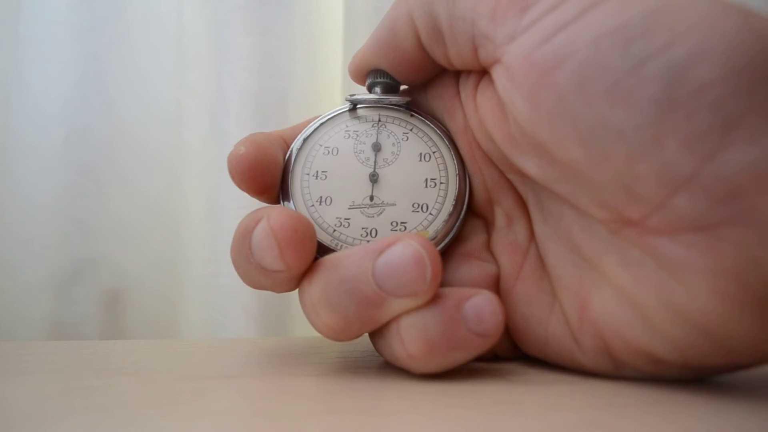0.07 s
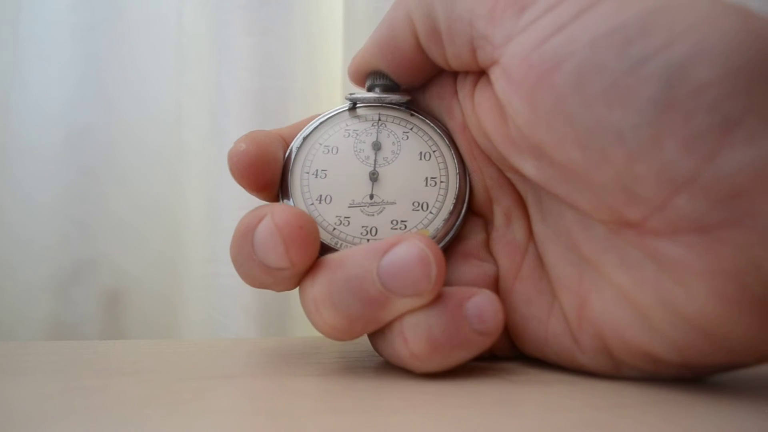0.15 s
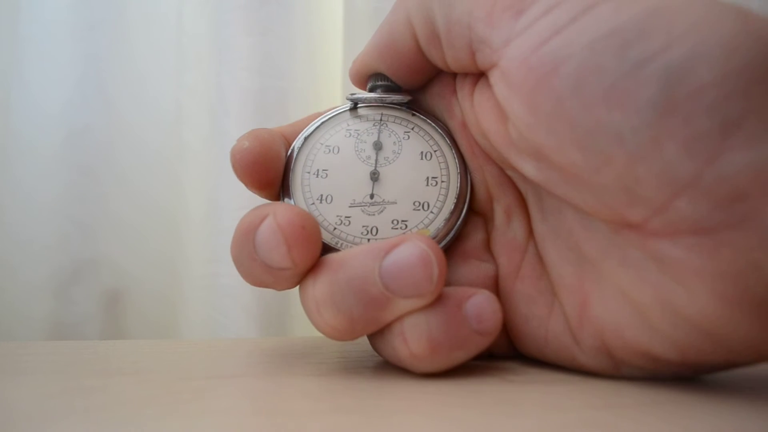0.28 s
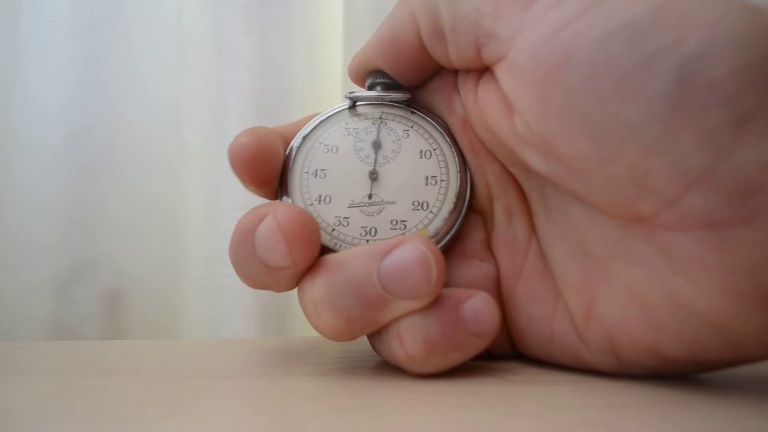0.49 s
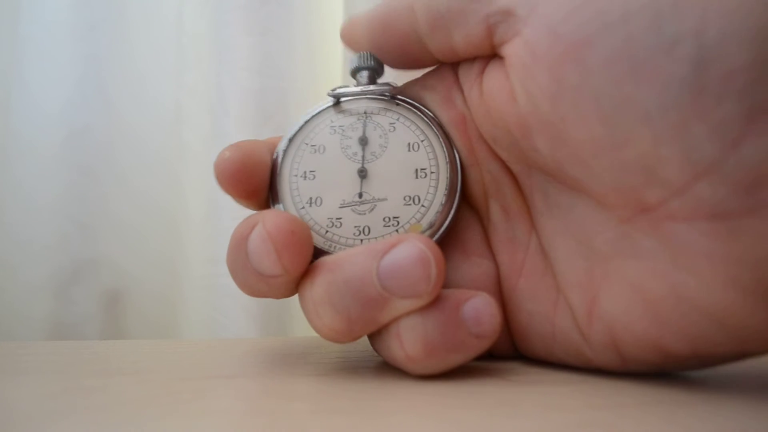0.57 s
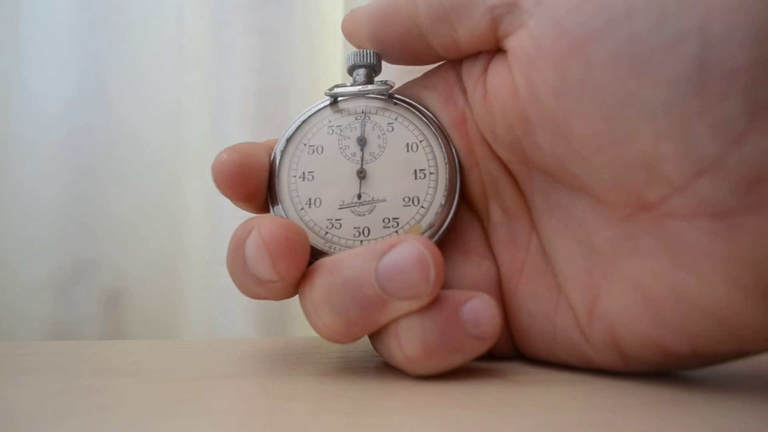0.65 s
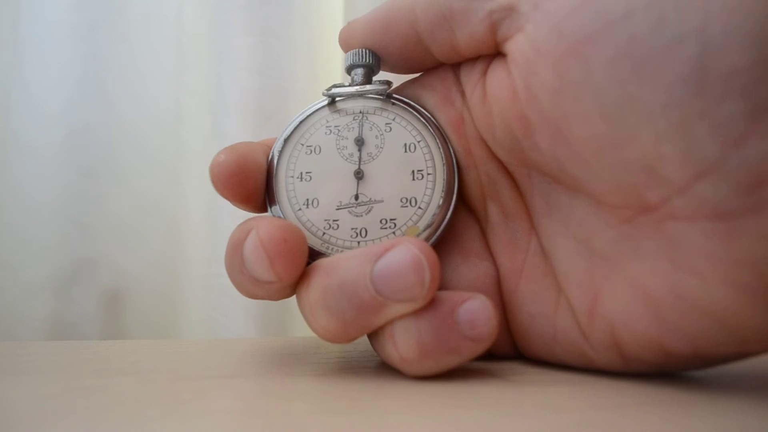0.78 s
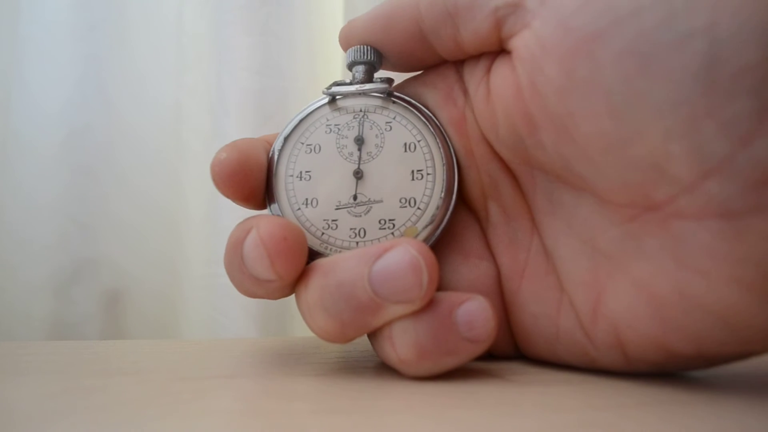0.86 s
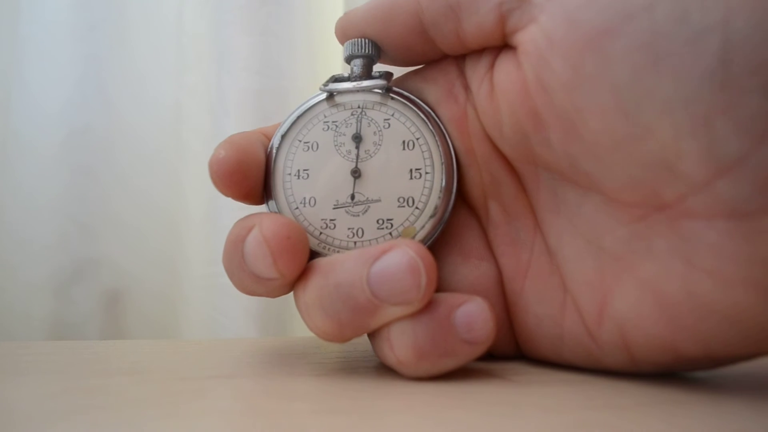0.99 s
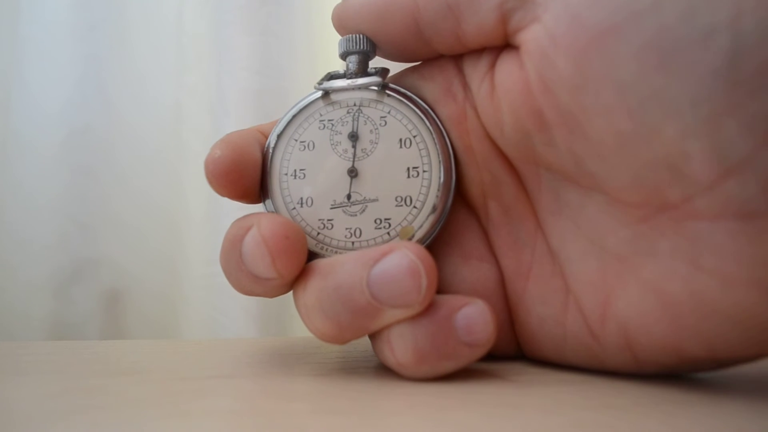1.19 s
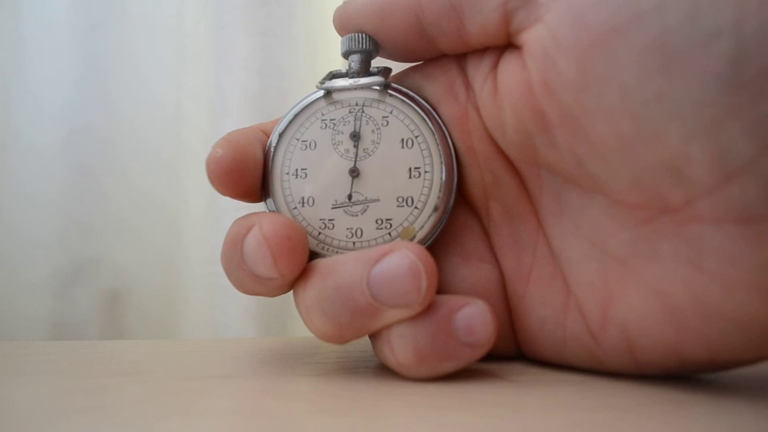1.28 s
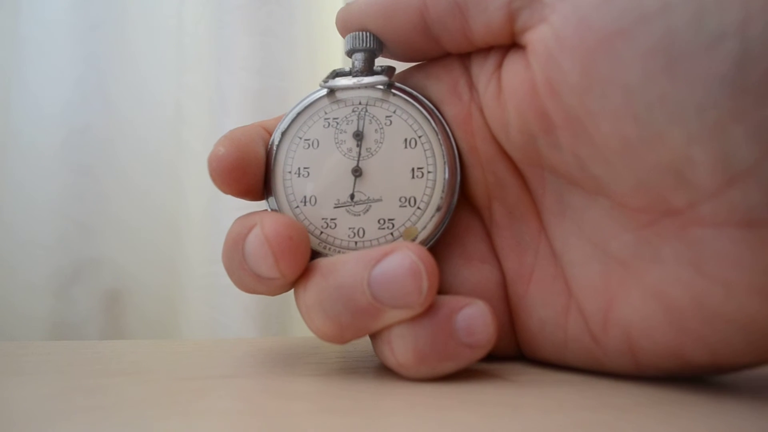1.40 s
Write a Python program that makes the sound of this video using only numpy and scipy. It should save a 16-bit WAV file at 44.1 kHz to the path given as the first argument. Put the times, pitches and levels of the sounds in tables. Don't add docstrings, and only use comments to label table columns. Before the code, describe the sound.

Close-up stopwatch button press and release indoors, a sharp bright click followed about 0.4 seconds later by a quieter, looser return click, with tiny regular escapement ticks, short room reflections and low air hiss underneath.

```python
import sys
import numpy as np
from scipy import signal
from scipy.io import wavfile
from scipy.ndimage import uniform_filter1d

SR = 44100
rng = np.random.default_rng(int(sys.argv[2]) if len(sys.argv) > 2 else 0)


def dump(signal):
    limited = np.clip(np.atleast_2d(signal).T, -1, 1)
    pcm = np.round(limited * 32767).astype(np.int16)
    wavfile.write(sys.argv[1], SR, pcm)


def volts_from_db(level):
    exponent = np.asarray(level, float) / 20
    return 10 ** exponent


N = 63945

# (time [s], level [dB], brightness [dB per octave])
SETTLE_HITS = [
    (0.0402, -43.5, 0),
    (.0411, -34.5, -0.6),
]
# (time [s], level [dB], brightness [dB per octave])
PRESS_HITS = [
    (.2214, -65.5, -6),
    (.2232, -12, -1.16),
    (.2237, -18, 4),
    (.2256, -42, 5.5),
]
# (time [s], level [dB], brightness [dB per octave], bridge ring [dB])
TICK_HITS = [
    (0.438, -68, 1.5, 1),
    (.4815, -58.5, -1.3, 8),
    (0.6859, -59.5, 4.5, -7),
    (0.8546, -69, 1.5, -7),
    (.8860, -53, -2.5, -8),
    (1.068, -83.5, 12.5, -2),
    (1.0925, -61, 2, 7),
    (1.2400, -66, -6, 1),
    (1.266, -72, 4.5, 0),
    (1.2926, -56, 2.5, -2),
]
# (time [s], level [dB], brightness [dB per octave])
RELEASE_HITS = [
    (.6054, -43, -5.5),
    (.6151, -38.5, -22.5),
    (.6161, -27, 11),
    (.6177, -17, -1.5),
    (0.6192, -32, -1),
    (0.6254, -36.5, -6.5),
    (0.6283, -46.5, 10),
    (.7160, -46.5, -6.5),
]


def evened(x):
    return x / np.sqrt(np.mean(x ** 2) + 1e-20)


def read(points, hz):
    f, value = np.transpose(points)
    return np.interp(np.log(hz + 1), np.log(f + 1), value)


def air():
    # (frequency [Hz], level [dB per Hz])
    hiss_tone = [(12, -37), (20, -11), (65, -18.5), (102, -16), (170, -8.5), (996, -3.5), (2410, -14.5),
                 (4460, -22), (12000, -43.5), (15600, -85.5), (22000, -120)]
    # (frequency [Hz], width [Hz], rise [dB])
    fan = [(220.2, 14, 8.5), (297.8, 22, 10), (416, 41.5, 6.5), (1026, 71, 3), (2838, 190, 9),
           (4518, 180, 9.5), (5250, 650, 6), (9400, 400, 2)]
    frames, hz = N // 512 + 5, np.fft.rfftfreq(2048, 1 / SR)
    real, imaginary, patches = rng.standard_normal((frames, 1025, 3)).T
    patches = evened(uniform_filter1d(uniform_filter1d(patches, 20, 0), 6, 1))
    shape_db = read(hiss_tone, hz) - 12 * np.clip((hz - 10500) / 1000, 0, 4)
    for centre_hz, width_hz, rise_db in fan:
        shape_db = shape_db + rise_db * np.exp(-2 * ((hz - centre_hz) / width_hz) ** 2)
    spectrum = (real + 1j * imaginary) * volts_from_db(shape_db[:, None] + 1.15 * patches)
    hiss = evened(signal.istft(spectrum, nperseg=2048, noverlap=1536)[1][:N])

    waver = evened(uniform_filter1d(uniform_filter1d(rng.standard_normal(N), 2000), 2000))
    hum_hz, hum_db, waver_db = 119.2, -70, 0.5
    hum = np.sqrt(2) * np.sin(2 * np.pi * hum_hz * np.arange(N) / SR)
    return volts_from_db(-60) * hiss + volts_from_db(hum_db + waver_db * waver) * hum


def strike(hits, modes, rise_s):
    hz, mode_db, t60 = np.transpose(modes)[:, :, None]
    bridge_hz, bridge_width_hz, spread_db = 4660, 830, 1.2
    bridge = np.exp(-((hz - bridge_hz) / bridge_width_hz) ** 2)
    signs = (-1.) ** np.arange(len(modes))[:, None]
    out, clock = np.zeros(N), np.arange(N) / SR
    spreads = rng.standard_normal((len(hits), len(modes), 1))
    for (start_s, db, tilt_db, *bridge_db), spread in zip(hits, spreads):
        first = int(start_s * SR) + 1
        t = clock[first:first + 8000] - start_s
        start_db = db + mode_db + tilt_db * np.log2(hz / 4000) + spread_db * spread
        start_db = start_db + sum(bridge_db) * bridge
        level = volts_from_db(start_db - 60 * t / t60)
        ringing = (signs * level * np.sin(2 * np.pi * hz * t)).sum(0)
        out[first:first + 8000] += (1 - np.exp(-t / rise_s)) * ringing
    return out


def settle():
    # (frequency [Hz], level [dB], t60 [s])
    touched_case = [(1064, -6.5, 0.0046), (1664, -12, 0.016), (2300, -7, 0.023), (2720, -1, 0.021),
                    (2930, -15, 0.0073), (4857, -5.5, 0.019), (5255, -14.5, 0.016), (7400, -17, 0.013),
                    (8690, -17, 0.008), (9480, -13, 0.0095), (11110, -33, .01)]
    return strike(SETTLE_HITS, touched_case, 0.0002)


def snap():
    start_s, db, _ = PRESS_HITS[1]
    t = np.maximum(np.arange(N) / SR - start_s, 0)
    crack, thud = t * 9700, t * 300 * 2 * np.pi
    body = volts_from_db(-6.5) * crack * (2 - crack) * np.exp(-crack)
    body += volts_from_db(-30) * thud * np.exp(-thud)
    return volts_from_db(db) * np.e * body


def press():
    # (frequency [Hz], level [dB], t60 [s])
    gripped_case = [(1245, -5.5, 0.0095), (1780, -2.5, 0.0068), (2632, -6, 0.023), (2460, -16, 0.047),
                    (2950, -3, 0.011), (3800, -18, 0.0067), (4906, 6, 0.026), (4710, -15.5, 0.048),
                    (5877, -11.5, 0.0086), (6800, 1, 0.0089), (7550, -8.5, .01), (9160, 1.5, 0.0085),
                    (10220, -7, 0.0044), (11000, -16, .003)]
    return strike(PRESS_HITS, gripped_case, 0.0001) + snap()


def ticks():
    # (frequency [Hz], level [dB], t60 [s])
    plates = [(2240, 2, 0.031), (2716, 2.5, 0.016), (2950, 3, 0.024), (3950, -3.5, 0.013),
              (4520, -5, 0.013), (5080, -3.5, .014), (6230, -5, 0.0083), (7100, -3.5, .012),
              (8330, 2.5, 0.011), (8960, -2.5, 0.012), (9500, -2.5, .01), (10930, -11, .01)]
    return strike(TICK_HITS, plates, 0.00018)


def release():
    # (frequency [Hz], level [dB], t60 [s])
    free_case = [(2190, -1.5, 0.004), (2764, 4, 0.023), (2740, -6.5, 0.0074), (3100, -25, 0.01483),
                 (4035, -2, 0.0056), (4812, 3.5, 0.012), (4520, -8, 0.0074), (6030, -4.5, 0.011),
                 (7380, 0, 0.011), (8700, -5, 0.0094), (9490, -3.5, 0.0085), (10180, -16.5, .012),
                 (10950, -24.5, 0.02), (12950, -46, .03)]
    return strike(RELEASE_HITS, free_case, 0.00045)


def contacts(hits, db):
    out = np.zeros(N)
    for hit in hits:
        out[round(hit[0] * SR)] = volts_from_db(hit[1] + db)
    return out


def room(x, tone):
    # (frequency [Hz], t60 [s])
    room_t60 = [(500, .15), (1300, 0.25), (3500, .25), (9000, 0.21), (12000, 0.21)]
    taps = np.zeros(SR // 2)
    at = np.arange(0, SR // 2 - 6, 6)
    taps[at + rng.integers(0, 6, len(at))] = rng.choice([-1., 1.], len(at))
    hz, t, bands = signal.stft(taps, SR, nperseg=256)
    fading_db = read(tone, hz)[:, None] - 60 * t / read(room_t60, hz)[:, None]
    tail = signal.istft(bands * volts_from_db(fading_db), SR, nperseg=256)[1]
    delay_s = 0.0035
    tail *= 1 - np.exp(-(np.arange(len(tail)) / SR / delay_s) ** 2)
    return signal.fftconvolve(x, tail / np.linalg.norm(tail))[:N]


def room_ring(x):
    # (frequency [Hz], level [dB])
    ring_tone = [(500, 2.5), (1500, -4.5), (2600, 2), (5000, -0.5), (6500, -5), (10500, -1), (12000, -12)]
    return volts_from_db(-21.5) * room(x, ring_tone)


def room_scatter():
    # (frequency [Hz], level [dB])
    scatter_tone = [(500, -25), (1500, -8), (3500, -2), (6500, -1), (9500, -8.5), (11200, -7),
                    (11900, -38.5), (16000, -59.5)]
    faint = RELEASE_HITS[:1] + RELEASE_HITS[-1:] + SETTLE_HITS[1:] + TICK_HITS
    clicks = contacts(PRESS_HITS[1:2], -8)
    clicks += contacts(RELEASE_HITS[3:4], -5.5)
    clicks += contacts(faint, -11.5)
    return room(clicks, scatter_tone)


def scene():
    down = press()
    rest = settle() + ticks() + release()
    echoes = room_ring(down + volts_from_db(-3) * rest) + room_scatter()
    return (air() + down + rest + echoes)[None]


def roll_off(x):
    return signal.sosfilt(signal.butter(12, 16830, fs=SR, output="sos"), x)


def record(dry):
    mic_hz, edge_hz = 12300, 16650
    rolled = signal.sosfilt(signal.butter(3, mic_hz, fs=SR, output="sos"), dry)
    spike = np.roll(contacts(PRESS_HITS[1:2], -9), 8)
    edge = signal.firwin(201, edge_hz, window=("kaiser", 8), fs=SR)[None]
    mix = signal.oaconvolve(rolled + spike, edge, "same")
    return roll_off(mix)


dry = scene()
out = record(dry)
dump(out)
```